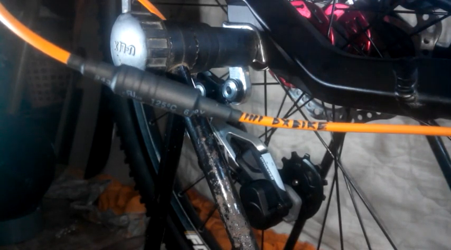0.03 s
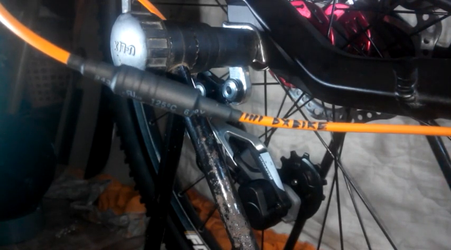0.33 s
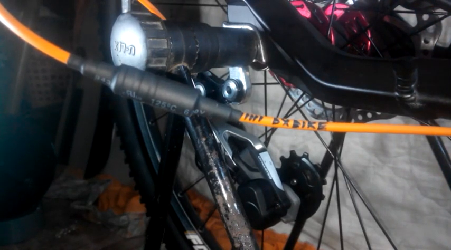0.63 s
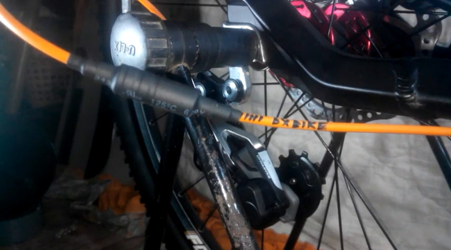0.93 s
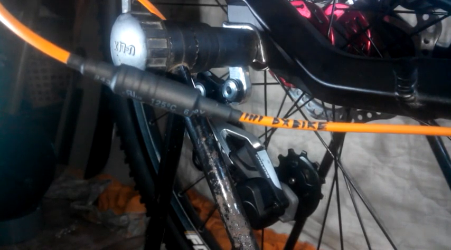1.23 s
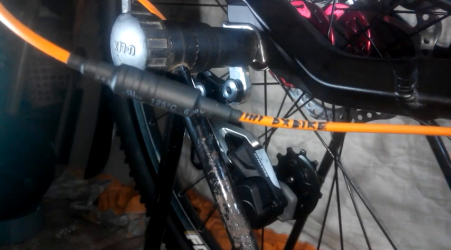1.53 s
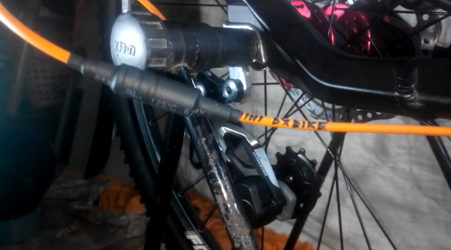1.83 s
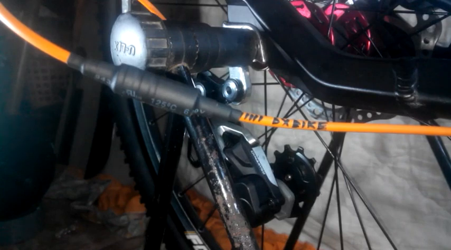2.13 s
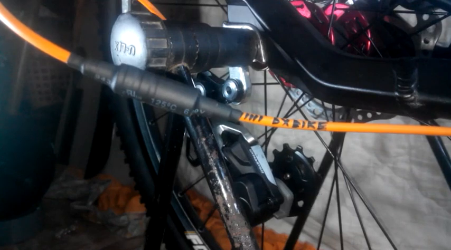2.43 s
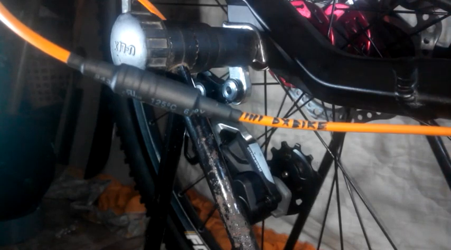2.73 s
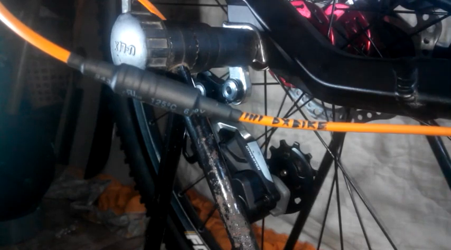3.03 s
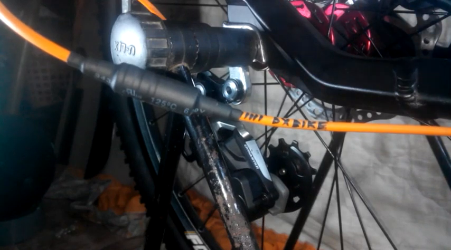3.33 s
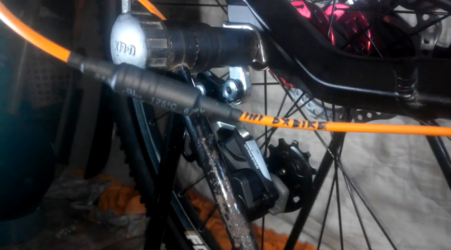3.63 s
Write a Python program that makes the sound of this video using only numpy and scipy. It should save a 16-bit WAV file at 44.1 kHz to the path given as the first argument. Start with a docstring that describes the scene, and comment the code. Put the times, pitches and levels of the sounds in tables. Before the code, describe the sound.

Sharp, evenly paced metallic clacks of a bicycle derailleur shifting, close by.

```python
"""Twelve sharp clacks sound in a small room: a bicycle's rear gear changer, the wheel standing still.
At each shift the ratchet scrapes for a few milliseconds and snaps home, and the metal parts ring
briefly. Frame and room answer with a low knock and a short echo. Some shifts are dull and hollow,
others bright. A quiet rumble and a thin hiss lie beneath."""
import sys
import numpy as np
from scipy import signal
from scipy.io import wavfile

SR = 44100
rng = np.random.default_rng(int(sys.argv[2]) if len(sys.argv) > 2 else 0)


def master_out(mix):
    """Clip the mix to full scale and print it as 16-bit PCM to the path in sys.argv[1]."""
    frames = np.transpose(np.atleast_2d(mix))
    ceiling = np.clip(frames, -1, 1)
    pcm = np.round(ceiling * 32767).astype(np.int16)
    wavfile.write(sys.argv[1], SR, pcm)


N = 163170

# The gear shifts. Each row: start in seconds, scrape growth time in seconds, body knock in dB, metal
# ring in dB, left minus right in dB, then the tone colour: six boosts or cuts in dB, from low to high.
SHIFTS = [(0.2351, 0.004, 4, -5.5, -6, -1.5, 2, 2, -5, -4, -6.5),
          (0.4552, 0.0029, -1, 3.5, -1.5, 0, 2.5, 0.2, 1.5, 2.5, 1),
          (0.7774, 0.0028, 3.5, -1.5, -0.5, -2, 0, -0.6, -2, -0.6, -6),
          (1.0788, 0.0017, -3, 3, 3.5, -3.5, -1.2, 0, 0.5, 2.5, -1),
          (1.3775, 0.0017, 3, -4.5, 1, 1, .5, 0, -4.5, -2.5, -6),
          (1.6292, 0.0019, -0.5, 1, 0, -1, 1, -1, 0, 0.3, 0.5),
          (1.9406, 0.0036, 2, -4.5, -4, .5, 2, 1.5, -3, -3, -5.5),
          (2.2242, 0.0024, -4, 0.5, 1, 1.5, -1, -2.5, -0.1, 0, 0),
          (2.5229, 0.0024, 1.5, -4, 1.5, -1.5, -1, -2, -6.5, -2.3, -5.5),
          (2.7752, .0011, -3, 0.5, 1.5, -0.5, -4.5, -5.5, -3, -1, -3),
          (3.0731, 0.0018, -3.5, -1, 0.5, -3, -6.3, -4, -6, 1, 2),
          (3.3647, .0011, -2.5, 0.5, 0, 2.5, -4, 0.5, -5.5, -1.2, -.3)]
# How alike left and right sound. Each row: frequency in Hz, likeness (1 means the same).
LIKENESS = [(100, 0.86), (300, 0.85), (560, 0.55), (1100, 0.07), (3000, 0.22), (12000, 0.13)]
SHIFT_LENGTH_S, SNAP_RISE_S = .7, .0006


def from_db(db):
    """Turn decibels into a gain."""
    return 10 ** (np.asarray(db) / 20)


def at_hz(points, hz):
    """Read between a table's rows on a log-frequency axis."""
    freqs, values = np.transpose(points)
    return np.interp(np.log(hz), np.log(freqs), values)


def dying(t, fade_s):
    """A fade from time zero; the fade time is how long it takes to drop 60 dB."""
    return from_db(-60 * np.maximum(t, 0) / fade_s)


def add(out, start_s, sound):
    """Mix a sound in at its start time."""
    i = int(start_s * SR)
    out[:, i:i + sound.shape[1]] += sound[:, :N - i]


def panned(db):
    """Left and right gains for a level difference."""
    return from_db(db * np.array([[.5], [-.5]]))


def stereo(pair, hz):
    """Blend two noises into left and right: alike in the bass, mostly unrelated in the treble."""
    mid, side = pair
    alike = at_hz(LIKENESS, hz)
    return np.sqrt((1 + alike) / 2) * mid + np.sqrt((1 - alike) / 2) * side * [[1], [-1]]


def white():
    """Two rows of noise at 0 dB per Hz."""
    return rng.standard_normal((2, N)) * np.sqrt(SR / 2)


def noise_bands():
    """Stereo noise in slices a third of an octave wide, each with its centre in Hz."""
    noises = white(), white()
    edges_hz = np.geomspace(28, 17000, 29)
    for k, edges in enumerate(zip(edges_hz, edges_hz[1:])):
        hz = np.sqrt(np.prod(edges))
        bandpass = signal.butter(2, edges, "band", fs=SR, output="sos")
        yield hz, stereo(signal.sosfilt(bandpass, noises[k % 2]), hz)


def strength(colour, hz):
    """How strongly one shift stirs up a frequency."""
    # Where the six tone colour values sit, in Hz.
    colour_hz = [120, 320, 780, 1800, 4400, 10000]
    return from_db(np.interp(np.log(hz), np.log(colour_hz), colour))


def burst(band, start_s, envelope):
    """A piece of noise shaped by a loudness curve, scaled so chance does not change its energy."""
    samples = int(start_s * SR) + np.arange(envelope.shape[-1])
    piece = np.take(band, samples, axis=1, mode="wrap") * envelope
    wanted_power = np.mean(band[:, ::10] ** 2) * np.mean(envelope ** 2)
    return piece * np.sqrt(wanted_power / np.mean(piece ** 2))


def background():
    """Gently wavering rumble, nearly steady hiss and a few narrow tones."""
    # Rumble and hiss. Each row: frequency in Hz, level in dB per Hz.
    levels = [(30, -103), (48, -99), (64, -88.5), (88, -94.5), (118, -87.5), (170, -93.5), (280, -100.5),
              (350, -96.5), (450, -104), (700, -109), (950, -107), (1400, -114), (3000, -117), (6000, -119),
              (8000, -127), (15000, -128)]
    # Their slow waver. Each row: frequency in Hz, typical swing in dB.
    swings = [(100, 1.5), (1000, 1.5), (3000, 0.3)]
    # Faint steady tones and a thin whine. Each row: pitch in Hz, width in Hz, peak in dB per Hz.
    tones = [(117.6, 10, -85), (203.7, 9.5, -86.5), (334, 13, -89), (365.3, 21, -89), (549.5, 14, -97),
             (6510, 720, -110)]
    out = 0
    for hz, band in noise_bands():
        waver = np.interp(np.arange(N), np.linspace(0, N, 30), rng.standard_normal(30))
        out += from_db(at_hz(levels, hz) + at_hz(swings, hz) * waver) * band
    for hz, width_hz, db in tones:
        peak = signal.iirpeak(hz, hz / width_hz, fs=SR)
        tone = signal.lfilter(*peak, signal.lfilter(*peak, white()))
        out += from_db(db) * stereo(tone, hz)
    return out


def room_echo():
    """The room's blurred answer to each shift: the lows build up later and last longer."""
    # The echo's tone. Each row: frequency in Hz, base level in dB per Hz.
    levels = [(30, -76.5), (70, -73), (140, -74.5), (280, -71.5), (560, -76.5), (1100, -75), (2200, -78.5),
              (4500, -81), (6400, -81), (8000, -87.5), (10500, -78.5), (13000, -88), (16000, -98.5)]
    # Its length. Each row: frequency in Hz, fade time in seconds.
    fades = [(80, 0.35), (300, 0.38), (700, 0.29), (2000, 0.25), (6000, 0.21), (13000, 0.16)]
    out, t = np.zeros((2, N)), np.arange(int(SHIFT_LENGTH_S * SR)) / SR
    for hz, band in noise_bands():
        rise_s = .0023 + 1.4 / hz
        envelope = (1 - np.exp(-t / rise_s)) * dying(t, at_hz(fades, hz))
        for start_s, _, _, _, _, *colour in SHIFTS:
            gain = from_db(at_hz(levels, hz)) * strength(colour, hz)
            add(out, start_s, gain * burst(band, start_s, envelope))
    return out


def ringing(notes, blows_db, spread_db, rise_s):
    """Every shift strikes each note with its own strength; high notes reach the sides out of step."""
    out, t = np.zeros((2, N)), np.arange(int(SHIFT_LENGTH_S * SR)) / SR
    for hz, db, fade_s in notes:
        right_phase = np.arccos(at_hz(LIKENESS, hz)) * rng.choice([-1, 1])
        phase = 2 * np.pi * hz * t + np.array([[0], [right_phase]])
        ring = np.exp(1j * phase) * dying(t, fade_s) * (1 - np.exp(-t / rise_s))
        for (start_s, _, _, _, _, *colour), blow_db in zip(SHIFTS, blows_db):
            gain = from_db(db + blow_db + spread_db * rng.standard_normal()) * strength(colour, hz)
            random_turn = np.exp(2j * np.pi * rng.random())
            add(out, start_s, gain * (random_turn * ring).real)
    return out


def frame_boom():
    """Frame, wheel and room swell into a low hum after each shift."""
    # Their natural notes. Each row: pitch in Hz, base level in dB, fade time in seconds.
    notes = [(64.7, -58, 0.5), (93.5, -52.5, 0.41), (143.6, -49, 0.26), (156.8, -45.5, .33),
             (204.5, -52, 0.42), (265.7, -54.5, .3), (300.6, -47.5, 0.17), (334.4, -61, 1),
             (369.7, -59.5, 0.85), (552.4, -60, 0.56), (1029, -61.5, 0.51)]
    return ringing(notes, np.zeros(len(SHIFTS)), spread_db=.5, rise_s=.015)


def body_knock(blows_db):
    """The struck body of the gear changer gives a hollow knock."""
    # Its natural notes. Each row: pitch in Hz, base level in dB, fade time in seconds.
    notes = [(429, -51.5, 0.16), (527, -54, 0.13), (668.6, -47.5, 0.12), (862, -44, 0.077),
             (1164, -45, 0.097)]
    return ringing(notes, blows_db, spread_db=1, rise_s=SNAP_RISE_S)


def metal_ring(blows_db):
    """The struck metal plates ring brightly, a little to the left."""
    # Their natural notes. Each row: pitch in Hz, base level in dB, fade time in seconds.
    notes = [(1400, -59.5, 0.031), (1622, -39, 0.044), (1750, -42, 0.031), (2003, -38, 0.05),
             (2553, -44.5, .06), (3046, -50, 0.045), (3580, -39, 0.041), (3930, -42.5, 0.054),
             (5950, -43, 0.034), (6460, -38.5, .035), (8800, -52, .05)]
    return ringing(notes, blows_db, spread_db=1, rise_s=SNAP_RISE_S) * panned(db=2.5)


def ratchet_snaps():
    """The ratchet scrapes ever louder, then snaps home: so many brief notes that they blur into noise."""
    # The snap's tone. Each row: frequency in Hz, base level in dB per Hz.
    levels = [(60, -90), (150, -84), (300, -72), (560, -78.5), (1100, -71), (2200, -66.5), (4500, -68),
              (6300, -68.5), (8000, -72.5), (10500, -65), (13000, -77), (16000, -85.5)]
    # Its length on the left. Each row: frequency in Hz, fade time in seconds.
    fades = [(200, 0.071), (900, 0.05), (2500, 0.023), (10000, 0.021)]
    # Its lean to the left. Each row: frequency in Hz, base left minus right in dB.
    balance = [(500, 1.5), (1500, 4.5), (4500, 4.5), (8000, 14.5), (11000, 2.5), (14000, 0)]
    lead_s, scrape_db, growth_db = .012, -5, 11
    right_late_s, right_stretch = .0005, 1.3  # the right side hears the snap indirectly
    out = np.zeros((2, N))
    t = np.arange(SR // 10) / SR - lead_s - np.array([[0], [right_late_s]])  # zero at the snap
    for hz, band in noise_bands():
        fade_s = at_hz(fades, hz) * np.array([[1], [right_stretch]])
        snap = np.clip(1 + t / SNAP_RISE_S, 0, 1) * dying(t, fade_s)
        for start_s, growth_s, _, _, pan_db, *colour in SHIFTS:
            scrape = from_db(scrape_db + growth_db * np.minimum(t, 0) / growth_s) * (t < 0)
            gain = from_db(at_hz(levels, hz)) * strength(colour, hz)
            sides = panned(at_hz(balance, hz) + pan_db)
            add(out, start_s - lead_s, gain * sides * burst(band, start_s, np.maximum(scrape, snap)))
    return out


def scene():
    """The gear changer close by and a little to the left, the room around it."""
    _, _, knock_db, ring_db, *_ = np.transpose(SHIFTS)
    struck_parts = body_knock(knock_db) + metal_ring(ring_db) + frame_boom()
    return struck_parts + ratchet_snaps() + room_echo() + background()


def record(dry):
    """Cut the highest treble steeply."""
    cutoff_hz = 15500
    return signal.sosfilt(signal.ellip(10, .1, 80, cutoff_hz, fs=SR, output="sos"), dry)


dry = scene()
out = record(dry)
master_out(out)
```